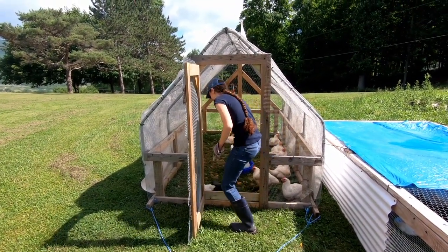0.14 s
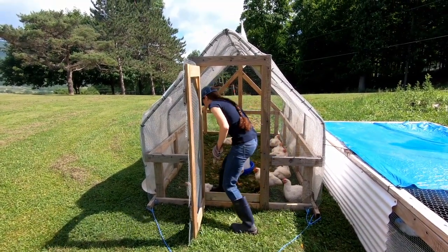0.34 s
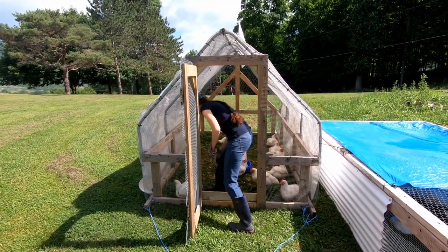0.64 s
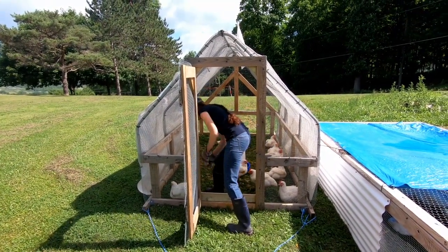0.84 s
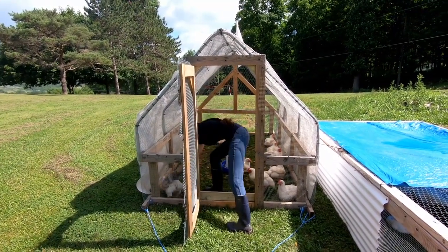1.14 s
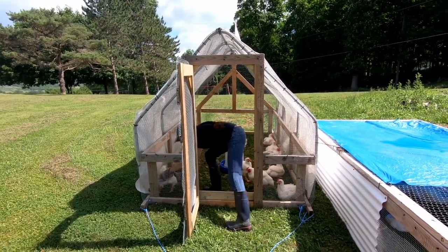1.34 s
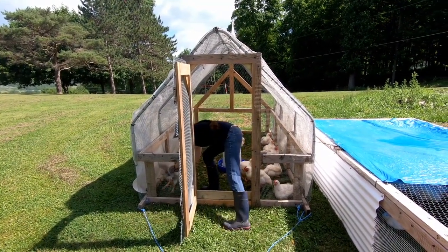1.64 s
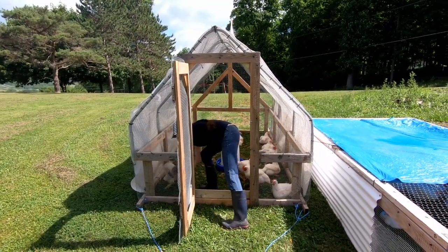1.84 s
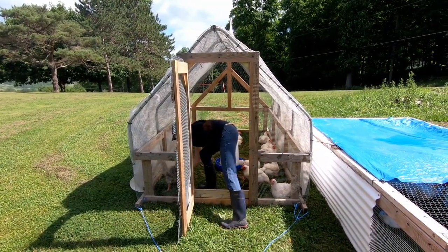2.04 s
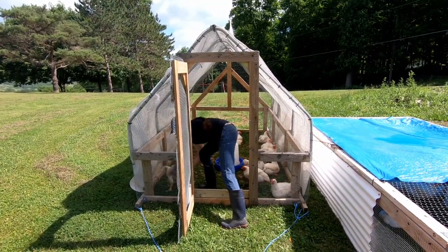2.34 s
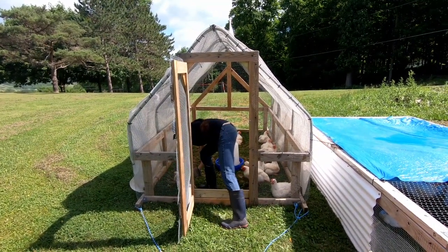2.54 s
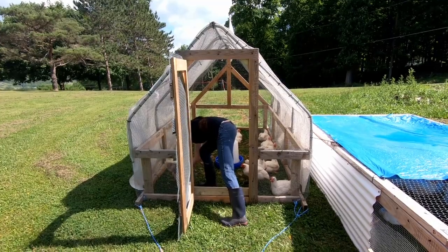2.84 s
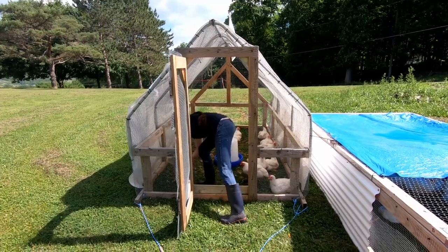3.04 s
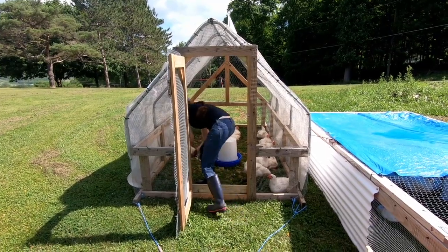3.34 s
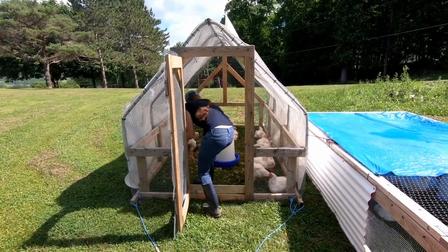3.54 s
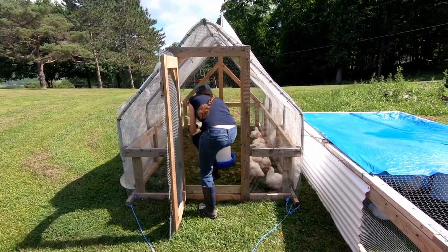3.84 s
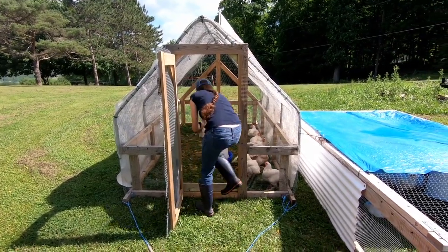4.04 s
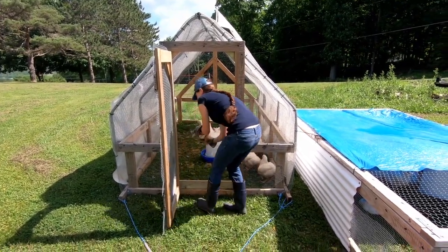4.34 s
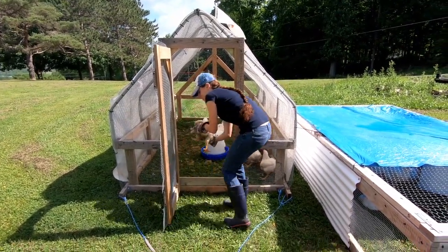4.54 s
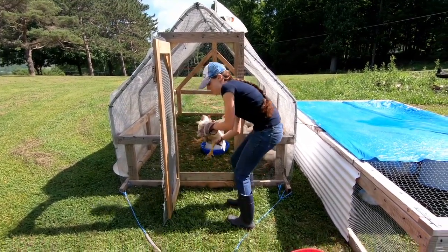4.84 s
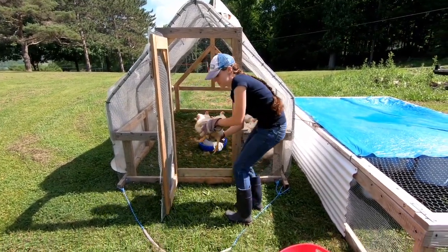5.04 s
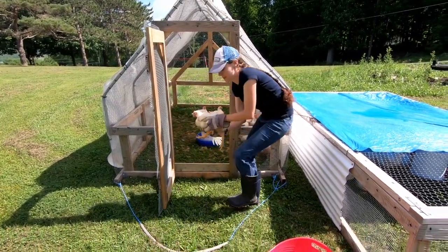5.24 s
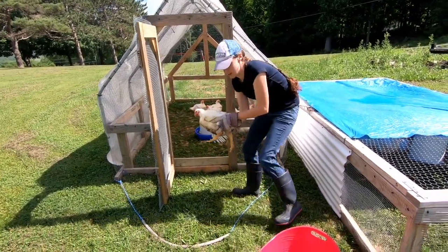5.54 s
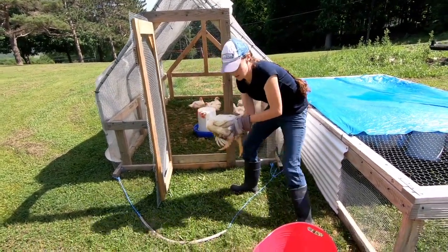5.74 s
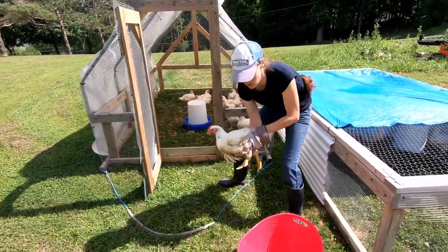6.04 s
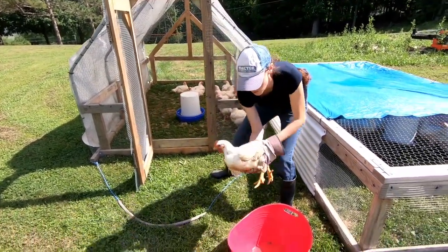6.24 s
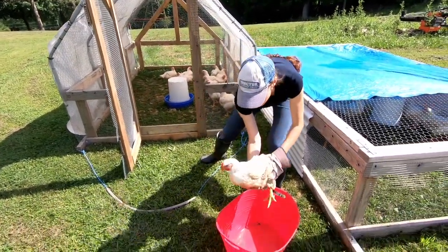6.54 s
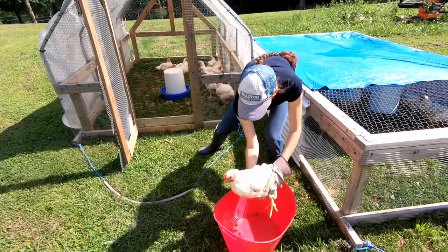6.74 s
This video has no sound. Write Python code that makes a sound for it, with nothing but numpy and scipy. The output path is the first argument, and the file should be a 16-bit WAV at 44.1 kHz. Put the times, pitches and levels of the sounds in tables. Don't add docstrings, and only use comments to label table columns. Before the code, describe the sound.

A young hen squawks hoarsely again and again as she is caught in a grass pen, with wooden knocks, peeping flock, songbird trill and wind buffeting.

```python
import sys
import numpy as np
from scipy import signal
from scipy.fft import rfft, irfft, next_fast_len
from scipy.io import wavfile
from scipy.ndimage import uniform_filter1d, map_coordinates

SR = 44100
rng = np.random.default_rng(int(sys.argv[2]) if len(sys.argv) > 2 else 0)


def dump_mix(stems):
    frames = np.atleast_2d(stems).T
    limited = np.clip(frames, -1, 1)
    pcm = np.round(limited * 32767).astype(np.int16)
    wavfile.write(sys.argv[1], SR, pcm)


def ratio(d):
    e = np.asarray(d, float) / 20
    return 10 ** e


N = 304290
T = np.arange(N) / SR


def unit(x):
    return x / np.sqrt(np.mean(x ** 2) + 1e-20)


def along(points, hz):
    point_hz, value = np.transpose(points)
    return np.interp(np.log(hz + 1), np.log(point_hz + 1), value)


def curves(rows):
    s, *columns = np.transpose(rows)
    return [np.interp(T, s, column) for column in columns]


def wobble(rate):
    knots = rng.standard_normal(int(N * rate / SR) + 4)
    return map_coordinates(knots, [T * rate])


def filtered(x, response):
    m = next_fast_len(N + SR // 2)
    spectrum = rfft(x, m) * response(np.fft.rfftfreq(m, 1 / SR))
    return irfft(spectrum, m)[..., :N]


def resonant(x, modes):
    def response(f):
        return sum(ratio(db) * (1j * f * width / (centre ** 2 - f * f + 1j * f * width)) ** 2
                   for centre, width, db in modes)
    return filtered(x, response)


def steady(x):
    power = np.abs(uniform_filter1d(x ** 2, size=SR // 20, axis=-1))
    return x / np.sqrt(power + 1e-12)


def rush(spectrum, alike, patchy_db):
    z = signal.stft(rng.standard_normal((2, N + 512)), nperseg=512)[2]
    patches = uniform_filter1d(rng.standard_normal(z.shape[1:]), size=6, axis=0)
    patches = uniform_filter1d(patches, size=10, axis=1)
    pair = signal.istft(z * ratio(patchy_db * unit(patches)), nperseg=512)[1][:, :N]
    turn = np.arccos(np.clip(alike, -1, 1)) / 2
    coloured = filtered(pair, lambda hz: ratio(along(spectrum, hz)))
    mid, side = coloured * [[np.cos(turn)], [np.sin(turn)]]
    return unit(np.array([mid + side, mid - side]))


def whistle(out, s, hz, db):
    at = np.arange(max(round(s[0] * SR), 0), min(round(s[-1] * SR), N))
    phase = 2 * np.pi * np.cumsum(np.interp(at / SR, s, hz)) / SR
    tone = ratio(np.interp(at / SR, s, db)) * np.sin(phase)
    return out + np.bincount(at, tone, N)


def wind():
    # time_s, level_db
    gusts = [(0.0, -27.5), (0.06, -27), (1.92, -20), (2.09, -28), (2.98, -23.5), (3.09, -39), (3.82, -24),
             (4.13, -37.5), (4.23, -31.5), (4.8, -61), (6.51, -37.5), (6.9, -45.5)]
    # frequency_hz, density_db (per Hz)
    buffet = [(8.8, -29), (15, -3), (43, 1), (87, 0.5), (148, -8.5), (207, -16.5), (265, -23.5), (386, -32),
              (480, -73), (620, -70), (1060, -120)]
    port_db = 2.06 * np.array([wobble(14), wobble(21)])
    shared_db = 3.46 * wobble(25)
    slow_db = 0.68 * np.array([wobble(3.13), wobble(2.77)])
    lumps = ratio(port_db + shared_db + slow_db)
    level = ratio(curves(gusts)[0] - 1.0 + np.array([[2.2], [-2.2]]))
    return level * unit(lumps * rush(buffet, alike=0.24, patchy_db=-2.0))


def background():
    # time_s, leaves_db, feet_db
    rustle = [(0, -50.5, -76), (.5, -55, -54), (1.15, -55.5, -53.5), (1.3, -45, -52), (2.3, -52, -55),
              (3, -58, -61.5), (4.4, -54.5, -56), (6.9, -59, -64)]
    # frequency_hz, density_db (per Hz)
    field = [(59, -45.5), (100, -7), (200, 2.5), (259, -6), (409, -12), (574, -14), (714, -12),
             (943, -13.5), (2700, -6.5), (5100, -19), (6470, -24), (9810, -38), (11500, -55.5),
             (15000, -103.5), (22000, -120)]
    # centre_hz, width_hz, level_db
    straw = [(850, 860, 0)]
    leaves_db, feet_db = curves(rustle)
    scuffle = unit(resonant(rng.standard_normal((2, N)), straw))
    feet = ratio(feet_db + 5.8 * wobble(25)) * scuffle
    leaves = ratio(leaves_db + 9.5 + 3.06 * wobble(6.7)) * rush(field, alike=0.81, patchy_db=2.5)
    return leaves + feet


def flock():
    # start_s, length_s, start_hz, middle_hz, end_hz, level_db
    peeps = [(0.005, .025, 2450, 2500, 2450, -46), (.032, .045, 2700, 2500, 2250, -47),
             (.068, .016, 7300, 6200, 5900, -48), (.16, .016, 7300, 6200, 5900, -48),
             (.015, .025, 4800, 4800, 4700, -52), (.108, .022, 4800, 4800, 4700, -52),
             (.2, .018, 4900, 4400, 3700, -53), (.47, .04, 2100, 2450, 2200, -48),
             (.508, .018, 1300, 1000, 750, -45), (.543, .018, 1350, 1300, 1280, -51),
             (.568, .012, 800, 950, 1200, -44), (.578, .04, 2000, 2300, 2100, -47),
             (.618, .012, 5300, 4500, 3500, -52), (.75, .06, 1500, 1320, 1200, -51),
             (.93, .08, 3100, 3450, 3600, -53), (1.04, .06, 3600, 3700, 3650, -50),
             (1.07, .04, 2400, 2300, 2200, -50), (1.0, .07, 1200, 1300, 1500, -51),
             (4.77, .03, 2400, 2550, 2650, -48), (4.82, .06, 3100, 2650, 2300, -46),
             (5.94, .055, 2250, 2200, 2100, -41), (6.4, .07, 2900, 2500, 2700, -52),
             (6.44, .12, 1200, 1250, 1150, -54), (6.608, .017, 2350, 2150, 2000, -51),
             (6.625, .06, 2100, 2700, 2850, -46), (6.745, .055, 2800, 2850, 2800, -49)]
    out, u = np.zeros(N), np.linspace(0, 1, 9)
    for s, length, start, middle, end, db in peeps:
        bow = np.polyfit([0, .5, 1], [start, middle, end], 2)
        soft_db = db - 14 * (2 * u - 1) ** 4
        out = whistle(out, s + length * u, np.polyval(bow, u), soft_db)
    return out


def frame():
    # start_s, peak_db, ring_hz
    knocks = [(0.307, -19, 180), (0.469, -22, 186), (2.185, -27, 157.4), (3.994, -24.5, 228),
              (4.036, -23, 328), (4.076, -26, 310), (4.119, -24, 305.4), (4.162, -28, 315.6),
              (4.207, -26, 323.5), (4.246, -20.5, 233), (4.354, -27, 212.1), (4.425, -28, 177.6),
              (4.653, -30.5, 266), (5.848, -31, 161)]
    # time_s, pitch_hz, level_db
    groan = [
        (3.928, 237.6, -65),
        (3.944, 239.5, -31),
        (3.985, 248.4, -30),
        (4.0, 251.7, -53),
    ]
    out, t = np.zeros(N + SR), np.arange(SR // 4) / SR
    for s, db, hz in knocks:
        onset = 1 - np.exp(-t / 0.00068)
        ring = ratio(-60 * t / 0.044) * np.sin(2 * np.pi * hz * t) * onset
        dull = uniform_filter1d(rng.standard_normal(len(t)), size=10)
        click = ratio(-20.5 - 60 * t / 0.012) * dull
        out[round(s * SR):][:len(t)] += ratio(db + 3.5) * (ring + click)
    return whistle(out[:N], *np.transpose(groan))


def hen():
    # time_s, pitch_hz, beak_db, chest_db and windpipe_db (both over the beak)
    squawks = [
        [(1.198, 818, -51, -11, -2), (1.206, 850, -33.5, -16, -3), (1.225, 850, -30, -8.5, -9),
         (1.248, 850, -59, -5, -8)],
        [(1.28, 887, -45, -3, -11), (1.33, 904, -35.5, -3, -19), (1.38, 892, -50, 16.5, 7),
         (1.44, 926, -26, 7.5, -3.5), (1.47, 947, -35, 9, 0), (1.5, 796, -46, 12.5, 0), (1.53, 769, -47, 2, 9)],
        [(1.545, 840, -47, 6, -4), (1.582, 858.6, -17, -3.5, -8), (1.625, 885, -19, -7.5, -8.5),
         (1.675, 780, -24, -9.5, -5.5), (1.695, 740, -33, -11, -15), (1.712, 742.5, -51, -11, -10)],
        [(1.74, 839, -53, -2, -2), (1.753, 839, -21.5, -11, -4), (1.79, 815, -16.5, -4, -9),
         (1.845, 777.5, -29.5, -14, -0.5), (1.862, 786, -72, -18, -11)],
        [(1.955, 839, -37, -2, 5), (1.97, 830, -50, -15, -11), (2.008, 850, -17.5, -13.5, -11.5),
         (2.046, 758, -16.5, -9, -13), (2.062, 760, -20.5, -13, -9.5), (2.135, 701, -30, -8, -9.5),
         (2.165, 689.5, -59, -18, -14)],
        [(2.183, 751, -46, -7, 8), (2.194, 750, -37, 3, 6), (2.21, 757, -51, -1, -7)],
        [(2.26, 823.6, -39, -4, -10), (2.273, 844, -23, -3, -3), (2.288, 859, -20.5, -9, -16),
         (2.312, 799, -36, -11, -7), (2.342, 789, -16.5, -3, -6), (2.365, 815, -16, -7, -11),
         (2.39, 829, -25.5, -15, -7), (2.42, 824, -56, -9, -6)],
        [(2.542, 780, -48, -13, -9), (2.552, 766, -28, -13, -17), (2.575, 760, -28.5, -15, -16),
         (2.602, 760, -43, -18, -15)],
        [(2.652, 790, -42, -13, -10), (2.662, 778, -38, -26, -6), (2.684, 724.6, -17.5, -6.5, -7),
         (2.7, 597, -21, -3, -5), (2.735, 559, -28.5, -8, 5), (2.762, 540, -61, -7, -7)],
        [(2.86, 872, -45, -7, -2), (2.872, 859, -15.5, -9, -5.5), (2.89, 815, -20.5, -7, -8),
         (2.93, 767.6, -23, -5, -4.5), (3.008, 797, -33, -7, -1), (3.024, 768.4, -55, -8, -6)],
        [(3.122, 718, -58, -5, -2), (3.13, 722, -30.5, -2, 6), (3.148, 760, -32.5, -14, -5),
         (3.16, 846, -29, -6, -11), (3.215, 804, -27.5, -3, -17), (3.3, 760, -17.5, -4.5, -11.5),
         (3.325, 698, -27, -5, -3), (3.355, 691, -57, -14, 5)],
        [(3.46, 795.6, -48, 4, 6), (3.473, 808, -33, -1, 7), (3.5, 795, -24.5, 1, -1.5),
         (3.54, 781, -33.5, -8, -4), (3.556, 790, -29.5, -3, -4), (3.6, 781, -42.5, 2, -6),
         (3.63, 782.5, -34.5, 0.5, -6), (3.695, 760, -18, -9.5, -11), (3.742, 667, -34.5, 7, 10.5),
         (3.772, 640, -54, -9, 0)],
        [(3.938, 770.6, -54, -9, -7), (3.95, 795, -39.5, -7, -4), (3.975, 837.4, -36, -2, -2),
         (3.992, 856, -22.5, -7, -15), (4.095, 767.7, -32.5, -2.5, -5), (4.122, 790, -21.5, -2, -11),
         (4.195, 779, -32.5, -6, -10), (4.208, 856.4, -26, -4.5, 0.5), (4.25, 826.5, -21.5, -5.5, -8.5),
         (4.292, 690, -24.5, 0, -2), (4.32, 700.4, -39, 1, 8.5), (4.345, 662.6, -32.5, 8.5, 0),
         (4.372, 688.5, -42, -5, 6), (4.39, 690, -60, -12, 1)],
        [(4.425, 618, -39, 2, 3), (4.44, 630.6, -39, 1, 4.5), (4.46, 640, -36.5, 3.5, 5.5),
         (4.478, 637, -52, -6, -6)],
        [(4.49, 835, -51, 5, -5), (4.502, 843.6, -23.5, -5, 0), (4.54, 834.7, -18.5, -9.5, -6),
         (4.632, 780, -30.5, -10, -10), (4.695, 778, -16, -9.5, -11.5), (4.715, 691, -31.5, 1.5, 15),
         (4.74, 694.5, -39, 3.5, 10), (4.765, 700, -69, -9, -2)],
        [(4.899, 800, -57, 3, -13), (4.908, 798, -33, 2, 12), (4.922, 802, -27, -16, -8),
         (4.93, 608, -22.5, -3.5, -6), (4.993, 575.6, -17, -8.5, -4), (5.003, 734, -17.5, -6, -4),
         (5.02, 729.5, -16.5, -4, -1.5), (5.065, 735, -35, 3.5, 17.5), (5.095, 760, -42, -15, -4)],
        [(5.335, 774, -65, 5, 4), (5.343, 800, -26.5, 0.5, 5), (5.423, 797.6, -32, -3, 10.5),
         (5.45, 796.7, -19.5, 2, 11.5), (5.55, 756.6, -36, 3, 15), (5.59, 750, -51, 2, -7)],
        [(5.99, 791, -44, -8, -10), (6.0, 798, -40.5, 6, 12.5), (6.018, 641, -23.5, -11, -1.5),
         (6.058, 626, -17.5, -6, 6), (6.07, 792, -26.5, -1.5, 10), (6.27, 800, -20.5, 2.5, 11),
         (6.33, 786, -30.5, 4.5, 16), (6.355, 766.6, -34.5, -6, 11.5), (6.372, 850, -39.5, 8.5, 4),
         (6.398, 850, -60, -8, -5)],
    ]
    rasp_db = [-18.5, -12, -17.5, -23.5, -11.5, -11, -20, -26, -6.5, -21.5, -31, -14, -15.5, -12, -16.5,
               -15, -16, -13.5]
    # start_s, roughness (0-1)
    roughness = [(0, .75), (1.39, .4), (1.5, .7), (1.575, .4), (1.62, .55), (1.755, .1), (1.815, .4),
                 (1.9, .7), (2.0, .5), (2.065, .25), (2.17, .8), (2.27, .6), (2.34, .2), (2.385, .5),
                 (2.5, .75), (2.69, .4), (2.73, .7), (2.865, .4), (2.93, .6), (3.1, .7), (3.24, .45),
                 (3.4, .7), (3.49, .5), (3.52, .75), (3.69, .45), (3.9, .75), (4.205, .45), (4.23, .65),
                 (4.28, .4), (4.305, .7), (4.51, .35), (4.57, .65), (4.7, .4), (4.74, .7), (4.928, .1),
                 (5.0, .2), (5.07, .6), (5.365, .5), (5.4, .65), (5.44, .3), (5.53, .55), (6.015, .55),
                 (6.07, .6), (6.13, .45), (6.34, .55)]
    # centre_hz, width_hz, level_db
    chest = [(760, 644, 0)]
    windpipe = [(1546, 400, 0)]
    beak = [(2395, 796, 10.5), (3263.5, 490, -7), (4225, 300, -20)]
    rasp_modes = [(4890, 540, 6.5), (6390, 1170, 4.5), (8610, 2300, -4)]

    pitch, beak_db, chest_db, pipe_db = curves(np.concatenate(squawks))
    s, rough_steps = np.transpose(roughness)
    rough = uniform_filter1d(rough_steps[np.searchsorted(s, T, "right") - 1], size=300)
    jitter = (.007 + .1 * rough ** 2) * wobble(220)
    phase = 2 * np.pi * np.cumsum(pitch * (1 + jitter)) / SR
    pulses = unit(sum(np.cos(k * phase) for k in range(1, 16)))
    uneven = 1 + .5 * rough * wobble(25) * np.cos(phase / 2)
    flutter = ratio(3.42 * rough * wobble(130))
    breath = (1 + 1.2 * np.cos(phase)) * rng.standard_normal((3, N))

    breath_share = np.clip(.03 + 1.2 * rough ** 1.5, 0, 1)
    breath_gain = np.sqrt(breath_share)
    tone = np.sqrt(1 - breath_share) * pulses * uneven
    source = flutter * (tone + breath_gain * breath[0])
    purer = source + flutter * .7 * tone
    voice = steady(resonant(source, beak))
    voice += ratio(chest_db) * steady(resonant(purer, chest))
    voice += ratio(pipe_db) * steady(resonant(purer, windpipe))

    scattered = breath_gain * (.5 * breath[0] + breath[1:])
    hiss = resonant(flutter * (0.27 * tone + scattered), rasp_modes)
    call = np.zeros((2, N))
    for rows, db in zip(squawks, rasp_db):
        during = (T > rows[0][0]) * (T < rows[-1][0])
        call += during * np.array([[1], [ratio(db)]])
    opening, rasp = uniform_filter1d(call, size=100)
    loudest_db = uniform_filter1d(beak_db + .5 * np.maximum(pipe_db, 0), size=900)
    hiss_level = ratio(loudest_db + 2.7 * wobble(30)) * rasp
    return voice * ratio(beak_db) * opening + steady(hiss) * hiss_level


def songbird():
    # note_number, onset_s, peak_db
    trill = [(0, 3.2, -36.5), (6, 5.1013, -40.5), (10.02, 5.327, -37), (14.04, 5.555, -42),
             (21.06, 5.956, -40), (29.1, 6.412, -40), (37, 6.8848, -35)]
    # time_s (from onset), pitch_hz, level_db
    note_shape = [(-.014, 5220, -7), (-.011, 5880, -4), (-.008, 7950, -13), (-.005, 8670, -20),
                  (0, 6900, -2.5), (.005, 6310, -1), (0.01, 6510, 3.5)]
    out = np.zeros(N)
    s, hz, db = np.transpose(note_shape)
    number, onset, peak_db = np.transpose(trill)
    for k, vary in enumerate(rng.standard_normal((int(number[-1]) + 1, 2))):
        start = np.interp(k, number, onset)
        note_db = np.interp(k, number, peak_db) + db + vary[1]
        out = whistle(out, start + s, hz * (1 + 0.0044 * vary[0]), note_db)
    return out


def pen(x):
    # frequency_hz, t60_s
    decay = [(500, 0.1), (2000, 0.14), (6000, 0.085), (12000, 0.13)]
    hz, t, z = signal.stft(rng.standard_normal((2, SR // 2)), SR, nperseg=256)
    fade = ratio(-60 * t / along(decay, hz)[:, None])
    tail = signal.istft(z * fade, SR, nperseg=256)[1]
    return signal.fftconvolve(x[None], tail / np.linalg.norm(tail[0]), axes=1)[:, :N]


def scene():
    bird = filtered(hen(), lambda hz: 1 / (1 + (520 / (hz + 1)) ** 12))
    far = flock() + songbird()
    near = bird + frame() + ratio(-8) * pen(bird[0])
    distant = far * ratio([[-4.5], [-1.5]]) + ratio(0) * pen(far)
    return near + distant + background() + wind()


def roll_off(x):
    return signal.sosfilt(signal.butter(12, 15680, fs=SR, output="sos"), x)


def record(dry):
    # frequency_hz, gain_db
    mic = [(20, 4.5), (10300, -0.5), (11200, -11), (15000, -5)]
    heard = filtered(dry, lambda hz: ratio(along(mic, hz)))
    mix = heard / (1 + np.abs(heard / 0.86) ** 4) ** 0.23
    return roll_off(mix)


dry = scene()
out = record(dry)
dump_mix(out)
```